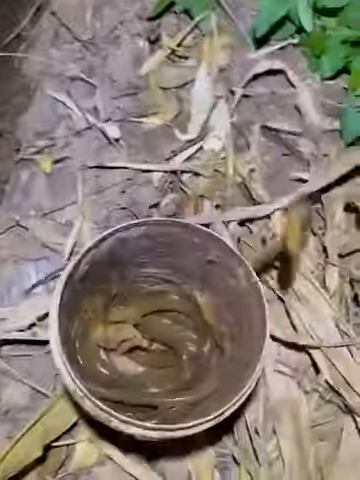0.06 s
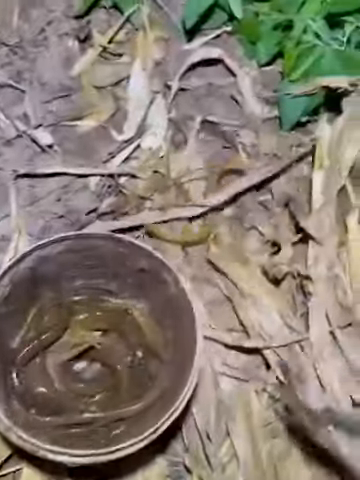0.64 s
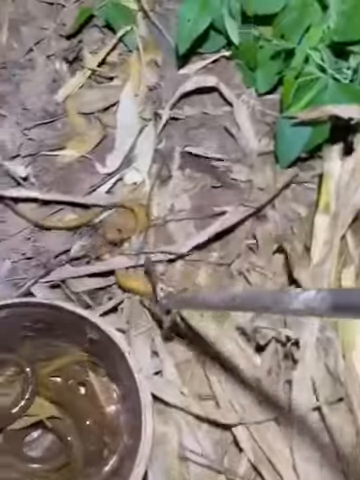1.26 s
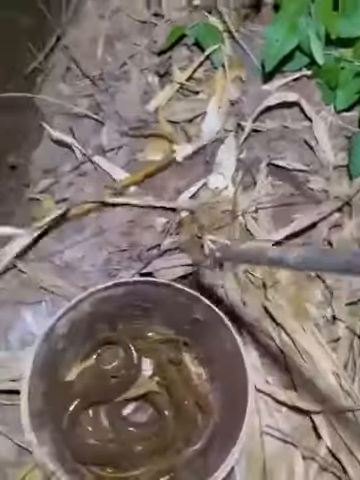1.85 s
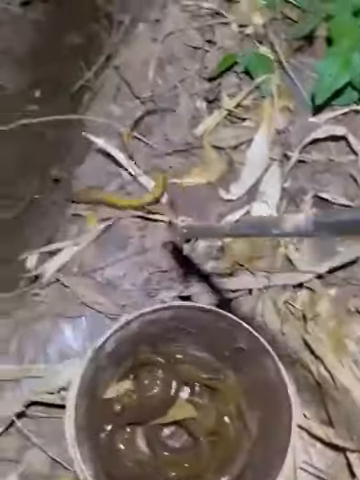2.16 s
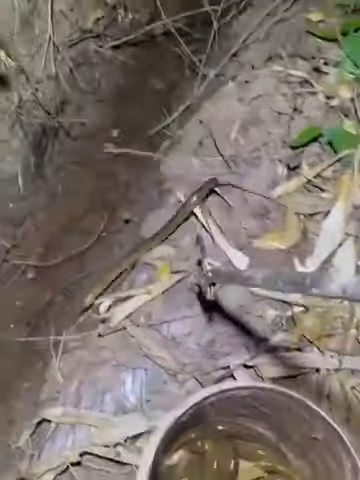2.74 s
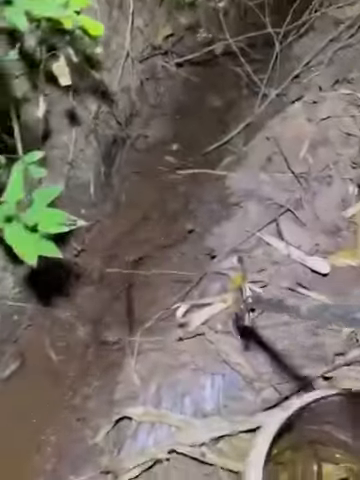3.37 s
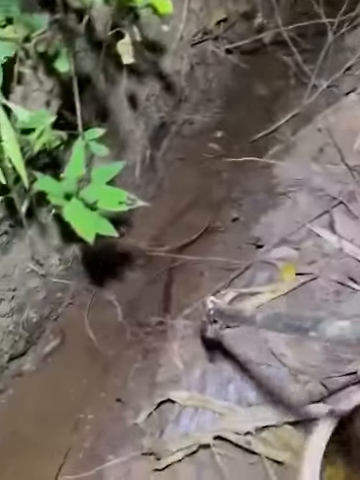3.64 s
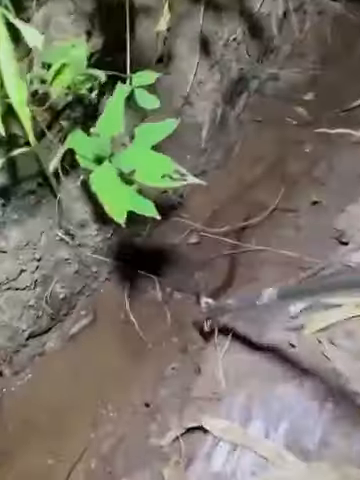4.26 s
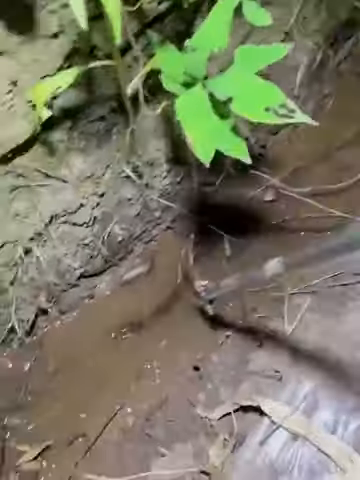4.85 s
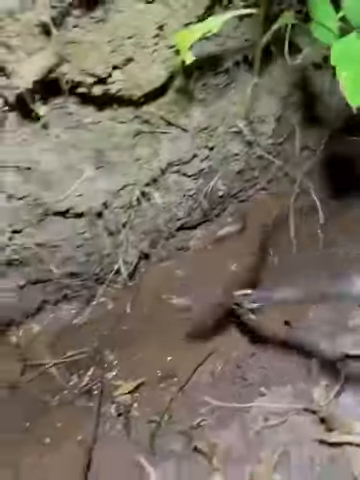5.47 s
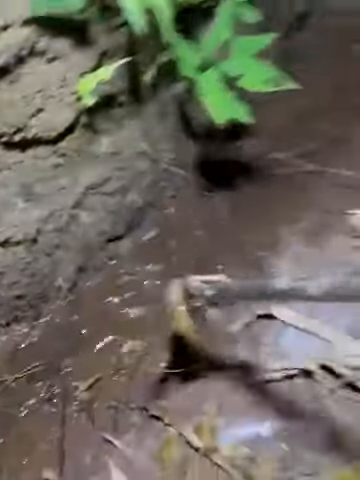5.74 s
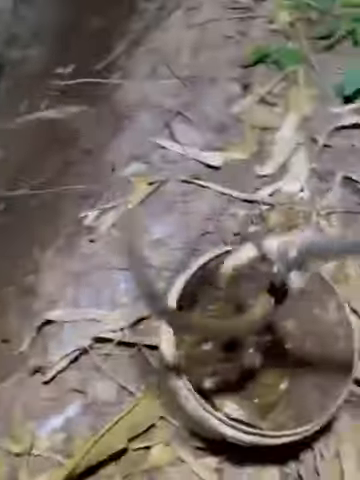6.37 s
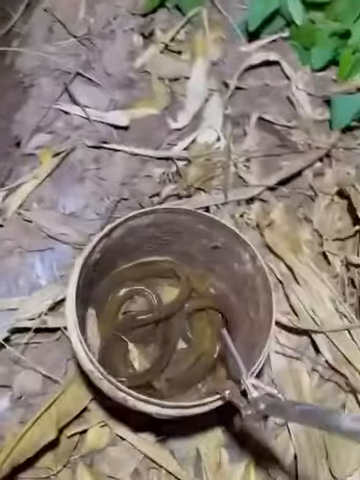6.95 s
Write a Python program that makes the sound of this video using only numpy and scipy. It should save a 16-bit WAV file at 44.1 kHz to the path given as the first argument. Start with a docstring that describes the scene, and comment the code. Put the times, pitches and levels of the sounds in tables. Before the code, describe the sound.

Outdoors at night, crickets chirp in the distance over a faint low rumble. Near the microphone an eel swishes through crackling dry leaves while metal tongs chase it, snapping once with a short buzzing ring and then clicking here and there. Mud smacks softly and a few faint bubbles pop. A louder clack of the tongs is followed by a cluster of wet slaps in a bucket.

```python
"""Dry leaves rustle and tick as an eel flops among them on a muddy bank at night.
Long metal tongs chase it: the jaws snap, their coil spring rings and buzzes, mud smacks, earth thumps.
At the end the eel drops into a bucket with wet slaps. Contacts are bursts of micro-impacts that ring
a body; rustle is fibres catching and slipping. Crickets sing in the distance over a low rumble."""
import sys
import numpy as np
from scipy import signal
from scipy.fft import rfft, irfft, next_fast_len
from scipy.io import wavfile
from scipy.ndimage import uniform_filter1d

SR = 44100
rng = np.random.default_rng(int(sys.argv[2]) if len(sys.argv) > 2 else 0)


def unload_audio(sound):
    """Save the sound as a 16-bit wav file, at the path given as the first command line argument."""
    columns = np.transpose(np.atleast_2d(sound))
    # keep every value between -1 and 1, then stretch to whole-number steps
    steps = np.round(np.clip(columns, -1, 1) * 32767)
    wavfile.write(sys.argv[1], SR, steps.astype(np.int16))


N = 317916
TIME_S = np.arange(N) / SR
LEAD_S = .01  # burst start to peak

# jaws snap or hit the ground: t/s, decay/s, contact f/Hz, thud/dB, strike/dB, brightness/dB per register
JAW_SNAPS = [(1.4242, .0052, 7360, -48, -26, 1), (1.4387, 0.0067, 4600, -60, -29, 3),
             (3.1008, 0.0065, 6550, -61, -40.5, 0), (3.1195, 0.0025, 7100, -55.5, -45, 4),
             (3.126, .0045, 14300, -78, -59.5, 8.5), (3.1793, 0.0079, 6120, -71, -42.5, -1.5),
             (3.4568, 0.0021, 2820, -44, -20, -14), (3.9394, 0.005, 3020, -37, -24, -6),
             (3.977, 0.0067, 2350, -42.5, -39, 1), (5.7116, 0.0018, 6600, -44.5, -38, .5),
             (6.1328, .0036, 4230, -29.5, -22.5, -4)]
# wet slaps in and beside the bucket: columns as JAW_SNAPS
WET_SLAPS = [(.2512, 0.0027, 730, -36, -29.5, -9), (6.5885, 0.006, 2370, -25.5, -32, -9),
             (6.5955, 0.011, 198, -35, -37, 1), (6.611, 0.01, 1450, -34, -36.5, -4),
             (6.631, 0.023, 1500, -33.5, -37, -5.5), (6.772, 0.017, 794, -29.5, -36.5, -9.5),
             (6.802, .0083, 1900, -33, -34.5, -12), (6.832, 0.0039, 3230, -46, -44, -7.5),
             (6.9805, 0.004, 867, -31.5, -25.5, -10.5)]
# tong resonances: f/Hz, width/Hz, level/dB
TONG_MODES = [(444, 60, -16), (814, 220, 13), (1150, 53, -6), (2315, 240, 7), (2540, 170, -1),
              (3220, 780, -4.5), (4350, 110, 1.5), (6000, 970, 0.5), (7790, 170, 4), (9900, 880, 6.5)]
# bucket resonances: f/Hz, width/Hz, level/dB
BUCKET_MODES = [(214, 87, 12), (354, 33, 21.5), (440, 44, 1.7), (926, 31, 4), (1300, 170, 7.8),
                (1860, 230, 7.2), (2780, 110, 1.3)]
# edges of the thud, knock, clack, click and fizz registers: f/Hz
REGISTER_EDGES = [150, 500, 1300, 3500, 8500, 16000]
# coil spring resonances: f/Hz, level/dB, t60/s
SPRING_MODES = [(2280, -14, .05), (3900, -16, 0.089), (6050, -10, 0.066), (9260, -2, 0.052),
                (9500, -4, 0.059), (10000, -3, .07), (10047, -7, 0.11), (9900, 1, 0.064), (10312, -7, .08),
                (9900, -25, .09), (10500, 4, 0.082), (10520, 2, .08), (9860, 0, .08), (10500, -6, .08),
                (11140, -17, .09), (11680, -17, .2)]
# spring rattles on its seat: t/s, level/dB
SPRING_JOLTS = [(1.4376, -33), (1.445, -24), (1.456, -38), (1.4647, -28)]
# leaf and twig ticks: t/s, level/dB, f/Hz, decay/s
LEAF_TICKS = [(.059, -27.5, 1380, 0.0088), (.234, -19, 1180, 0.024), (.314, -23.5, 3280, 0.0092),
              (.831, -21.5, 2240, 0.0086), (1.33, -23.5, 1570, 0.011), (2.204, -32, 2540, 0.0086),
              (2.227, -29, 3280, .002), (2.836, -29.5, 3290, .005), (3.409, -24.5, 6600, 0.0045),
              (3.572, -23, 5970, 0.0043), (3.919, -20, 2130, 0.016), (3.97, -25, 2530, .0072),
              (4.032, -23.5, 3220, 0.013), (4.078, -24.5, 7700, 0.0034), (4.23, -22.5, 7200, 0.0068),
              (4.405, -25.5, 1980, 0.012), (4.643, -28.5, 4570, .008), (5.176, -29, 7720, 0.013),
              (5.837, -25.5, 1460, 0.0065), (6.469, -29, 2520, 0.0032), (6.561, -22.5, 4370, .007)]
# smacks of mud and wet skin: t/s, level/dB, f/Hz, decay/s
MUD_SMACKS = [(1.597, -31.5, 950, 0.0068), (1.716, -31, 372, 0.01), (1.915, -30, 334, 0.013),
              (2.017, -37.5, 700, .005), (2.387, -35, 2290, .0081), (2.458, -41.5, 705, .004),
              (2.96, -35.5, 795, 0.005), (3.923, -23, 2390, 0.026), (4.038, -31, 725, .008),
              (4.101, -27.5, 1090, .004), (4.644, -37.5, 515, 0.0097), (4.827, -36, 1900, 0.011),
              (5.16, -33.5, 2380, 0.013), (5.624, -33.5, 2370, 0.011), (6.013, -28.5, 364, 0.029),
              (6.537, -21, 900, 0.0018), (6.72, -20.5, 1220, .0045), (6.741, -25, 1400, 0.0069)]
# bubbles and drips, and one short squeak played alike: t/s, level/dB, f/Hz, decay/s
BUBBLES = [(2.588, -49, 2230, 0.0036), (3.622, -51, 507, 0.0026), (3.655, -54.5, 1366, 0.015),
           (3.672, -47.5, 388, 0.007), (3.711, -52, 324, 0.0065), (5.471, -40.5, 2780, 0.002),
           (6.561, -35, 4300, .003)]
# thumps on soft earth: t/s, level/dB, f/Hz
TREADS = [(1.597, -41.5, 110), (2.535, -38, 127), (3.981, -38, 175), (4.039, -40.5, 127),
          (6.594, -36.5, 101), (6.606, -34, 150)]
# pushes through the litter: t/s, length/s, rub/dB, crisp hiss/dB
STROKES = [(0, 0.26, -53, -65), (0.236, 0.57, -45.5, -52), (.85, 0.3, -54.5, -58.5),
           (1.355, 0.16, -43.5, -48.5), (1.577, 0.66, -54.5, -59), (2.34, 1, -57, -63),
           (2.927, 0.037, -51, -56), (3.449, 0.088, -43.5, -51), (4.101, 0.08, -52, -56),
           (4.262, 0.21, -55.5, -63.5), (5.687, 0.615, -53.5, -62.5), (6.464, 0.017, -39.5, -50.5),
           (6.58, 0.045, -44, -56), (6.78, 0.029, -44.5, -57), (6.976, 0.14, -49, -63.5)]
# litter rub: f/Hz, level/dB
RUB_SPECTRUM = [(120, -7), (300, 2.5), (600, 1.5), (1200, 1), (2300, 1), (3800, -3), (5500, -7.5),
                (7700, -2.5), (8500, -14), (16000, -65)]
# crisp leaf hiss: f/Hz, level/dB
CRISP_SPECTRUM = [(1500, -26), (4000, 7), (7000, 2), (8050, 2), (8400, -2.5), (11000, -1.5), (13000, -8.5),
                  (15500, -7), (16200, -41)]
# eel slides over husks and bucket rim: t/s, level/dB, half length/s
SWISHES = [(0.254, -38, 0.043), (0.632, -37.5, 0.066), (1.422, -38, 0.0054), (5.288, -45, 0.039),
           (6.48, -53, 0.017)]
# husk friction: f/Hz, level/dB
HUSK_SPECTRUM = [(300, -3.5), (1200, -8), (2300, 3.5), (4500, -4), (6000, 1.5), (7500, 1), (8500, -12),
                 (15000, -19)]
# bush cricket bouts: start t/s, end t/s, level/dB
CHIRP_BOUTS = [(.30, 1.9, -59.5), (2.018, 4.6, -51), (5.21, 7.2, -51)]
# lower cricket: t/s, level/dB
TRILL_LEVEL = [(0, -60.5), (1.0, -58), (2.2, -74), (2.5, -73.5), (7.21, -61)]
# far insects: f/Hz, level/dB
CHORUS_SPECTRUM = [(300, -20), (1200, -24), (2200, -6), (3400, -11), (4000, 5.5), (4500, -8), (6000, -17),
                   (7000, 0.5), (7400, -10), (8050, -2), (8350, -67), (12000, -49), (13000, -42)]
# rumble colour: f/Hz, level/dB
RUMBLE_SPECTRUM = [(20, -30), (35, -13), (52, 2), (85, 2.5), (125, -6), (200, -1), (260, -9.5), (350, -28),
                   (700, -95), (2000, -66)]
# rumble swell: t/s, level/dB
RUMBLE_LEVEL = [(0, -60), (.28, -53.5), (.74, -56), (4.28, -55), (4.6, -59.5), (5.8, -55), (6.3, -56.5),
                (6.63, -49), (7.0, -56.5)]
# left-right likeness, close contacts: f/Hz, coherence/0-1
CLOSE_COHERENCE = [(50, .99), (200, 1), (500, 0.84), (1000, 0.52), (2000, 0.93), (4000, 0.51), (8000, 0.57),
                   (15000, .4)]
# left-right likeness, diffuse sound: f/Hz, coherence/0-1
DIFFUSE_COHERENCE = [(60, 1), (110, 1), (200, 1), (380, 0.68), (700, 0.26), (1290, 0.81), (2380, 1),
                     (4400, 0.15), (8120, 0.64), (15000, 0.62)]
# left lead of the tong contacts: f/Hz, phase/rad
LEFT_LEAD = [(200, -.1), (400, -0.77), (700, -0.88), (1100, -0.81), (1600, -0.23), (2800, 0.31),
             (5000, -1.05), (9000, -1.1), (15000, -.3)]
# left minus right: f/Hz, level/dB
BALANCE = [(200, 0), (350, -.8), (700, -4.5), (1400, -1.2), (2800, -1), (5500, .5), (14000, 0)]


def tongs():
    """Hard jaw contacts ring the metal, with a left-right phase twist."""
    snaps = blows(JAW_SNAPS, TONG_MODES, rise_s=.0014, spread=1, thud_hold=4.2, lag_s=.0003, direct=.94,
                  contact_db=8, contact_width=.076, top_hz=15400, knock_share=.35, click_db=5)
    phase_rad = at_hz(LEFT_LEAD, bins(snaps)) * np.array([[.5], [-.5]])
    return filtered(snaps, np.exp(1j * phase_rad))


def eel_slaps():
    """A soft, wet body hits ground and bucket."""
    return blows(WET_SLAPS, BUCKET_MODES, rise_s=.0012, spread=.64, thud_hold=.57, lag_s=.00217,
                 direct=.89, contact_db=6.5, contact_width=.13, top_hz=11100, knock_share=.95,
                 click_db=-.5)


def blows(rows, body, rise_s, spread, thud_hold, lag_s, direct, contact_db, contact_width, top_hz,
          knock_share, click_db):
    """Contacts ring the body and their own pitch: weight gives thud, strike clack, hardness treble."""
    out = np.zeros((2, N))
    for s, decay_s, contact_hz, thud_db, strike_db, bright_db in rows:
        sharp = impact_burst(decay_s, rise_s, spread)
        soft = impact_burst(decay_s * thud_hold, rise_s, spread)
        hz = bins(sharp)
        modes = list(body) + [(contact_hz, contact_hz * contact_width, contact_db)]
        ring = direct + sum(gain(db) / (1 + 2j * (hz - f) / width_hz) for f, width_hz, db in modes)
        ring = ring * squash(hz, lag_s) / (1 + (hz / top_hz) ** 10)
        sharp, soft = stereo(sharp, ring), stereo(soft, ring)
        knock_db = thud_db + knock_share * (strike_db - thud_db)
        bands_db = [thud_db, knock_db, strike_db,
                    strike_db + bright_db + click_db, strike_db + 2 * bright_db]
        for lo, hi, db, drive in zip(REGISTER_EDGES, REGISTER_EDGES[1:], bands_db, [soft] + 4 * [sharp]):
            band = signal.sosfilt(signal.butter(3, [lo, hi], "band", fs=SR, output="sos"), drive)
            add(out, s - LEAD_S, gain(db) * unit_rms(band) * np.sqrt(.01 * SR / band.shape[1]))
    return out


def impact_burst(decay_s, rise_s, spread, size=4096):
    """Micro-impacts swell and die away; mid and side rows, side scaled by spread."""
    t = np.arange(size) / SR - LEAD_S
    rise_s = min(rise_s, .3 * decay_s)
    envelope = np.exp(-np.maximum(-t / max(rise_s, 1e-4), t / max(decay_s, 3e-4)))
    spectrum = rfft(rng.standard_normal((2, size)) * envelope)
    flattened = irfft(spectrum / np.sqrt(abs(spectrum) + 1e-9), size)
    return flattened * envelope ** .3 * np.array([[1], [spread]])


def squash(hz, lag_s):
    """A soft contact widens as it lands, so lows come later: by lag_s at 500 Hz."""
    return np.exp(-4j * np.pi * lag_s * np.sqrt(500 * hz))


def spring_ring(shimmer_rad=.96, detune=.0033, rise_s=.00035):
    """Each jolt rings the coil's close, beating modes at a slightly different tuning."""
    out, t = np.zeros((2, N)), np.arange(SR // 5) / SR
    for s, jolt_db in SPRING_JOLTS:
        phases = rng.uniform(0, 2 * np.pi, (len(SPRING_MODES), 1, 1))
        phases = phases + shimmer_rad * rng.standard_normal((len(SPRING_MODES), 2, 1))
        stretch = 1 + detune * rng.standard_normal()
        ring = sum(gain(jolt_db + db - 60 * t / t60_s) * np.sin(2 * np.pi * hz * stretch * t + phase)
                   for (hz, db, t60_s), phase in zip(SPRING_MODES, phases))
        add(out, s, ring * (1 - np.exp(-t / rise_s)))
    return out


def coil_buzz(buzz_db=-10, decay_s=.048):
    """The coil's turns chatter against one another after each jolt."""
    power = sum(gain(2 * db) * (TIME_S > s) * np.exp(-2 * abs(TIME_S - s) / decay_s)
                for s, db in SPRING_JOLTS)
    return gain(buzz_db) * np.sqrt(power) * noise_band(hz=10450, width_hz=1300)


def leaf_ticks():
    """Dry leaves and twigs: broad, sharp pops."""
    faint = scattered(start_s=-.8, end_s=7.5, db=-36, low_hz=2000, high_hz=8000)
    return pops(list(LEAF_TICKS) + faint, pop_db=-10.5, width_oct=1, rise_s=.00089, lag_s=0)


def mud_smacks():
    """Mud and wet skin: narrower pops, falling in pitch."""
    faint = scattered(start_s=1.5, end_s=5, db=-43, low_hz=652, high_hz=2400)
    return pops(list(MUD_SMACKS) + faint, pop_db=-9.5, width_oct=.65, rise_s=.0019, lag_s=.001956)


def scattered(start_s, end_s, db, low_hz, high_hz, count=12, spread_db=3, decay_s=.004):
    """Pop rows of random time, level and pitch."""
    offsets, sizes, pitches = rng.random((count, 3)).T
    times_s = start_s + (end_s - start_s) * (np.arange(count) + offsets) / count
    return [(s, db + spread_db * (2 * size - 1), low_hz * (high_hz / low_hz) ** pitch, decay_s)
            for s, size, pitch in zip(times_s, sizes, pitches)]


def pops(rows, pop_db, width_oct, rise_s, lag_s, max_decay_s=.012):
    """Small contacts, each a burst with a spectral hump at its pitch."""
    out = np.zeros((2, N))
    for s, db, centre_hz, decay_s in rows:
        burst = impact_burst(min(decay_s, max_decay_s), rise_s, spread=1)
        hz = bins(burst)
        hump = 1 / (1 + (np.log2((hz + 1) / centre_hz) / width_oct) ** 2)
        tilt_db = at_hz([(100, 18), (400, 9), (8000, 4), (9000, -5), (16000, -12)], hz)
        pop = stereo(burst, hump * squash(hz, lag_s) * gain(tilt_db))
        add(out, s - LEAD_S, gain(db + pop_db) * pop * np.sqrt(.003 * SR / pop.shape[1]))
    return out


def bubbles(climb_per_s=2.7):
    """Bubbles ring, rising in pitch as they near the surface; a short squeak rings the same way."""
    out, t = np.zeros((2, N)), np.arange(SR // 10) / SR
    for s, db, hz, decay_s in BUBBLES:
        envelope = gain(db) * t / decay_s * np.exp(1 - t / decay_s)
        blip = envelope * np.sin(2 * np.pi * hz * (t + climb_per_s * t ** 2 / 2))
        add(out, s, np.array([blip, blip]))
    return out


def treads(decay_s=.0056):
    """Weight settles on soft earth: a few dull cycles."""
    out, t = np.zeros((2, N)), np.arange(SR // 4) / SR
    for s, db, hz in TREADS:
        thump = gain(db) * t / decay_s * np.exp(1 - t / decay_s) * np.sin(2 * np.pi * hz * t)
        add(out, s, np.array([thump, thump]))
    return out


def rustle(rub_db=1, crisp_db=5.5, clump_db=2.05):
    """Eel and tongs slide through the litter; grains come in clumps."""
    clumps = gain(clump_db * drift(top_hz=16.8))
    rub_gain, crisp_gain = stroke_gains()
    rub = diffuse(clumps * grains(per_s=1500, size_db=1.5, friction=1.52), RUB_SPECTRUM)
    rub = flicker(rub, depth_db=3) * rub_gain
    crisp = diffuse(clumps * grains(per_s=3800, size_db=4, friction=4.1), CRISP_SPECTRUM)
    crisp = flicker(crisp, depth_db=5) * crisp_gain
    return gain(rub_db) * rub + gain(crisp_db) * crisp


def stroke_gains(attack_s=.071, release_s=.074, rest_rub_db=-66.5, rest_crisp_db=-61.5):
    """Strokes swell, hold and fade; the litter never quite settles."""
    rub_power, crisp_power = gain(rest_rub_db) ** 2, gain(rest_crisp_db) ** 2
    for s, length_s, rub_db, crisp_db in STROKES:
        fade = np.maximum((s - TIME_S) / attack_s, (TIME_S - s - length_s) / release_s)
        push = np.exp(-np.clip(fade, 0, 20))
        rub_power += (gain(rub_db) * push) ** 2
        crisp_power += (gain(crisp_db) * push) ** 2
    return np.sqrt(rub_power), np.sqrt(crisp_power)


def swishes():
    """The eel's short, fast slides swell out of the rustle."""
    swell = sum(gain(db) * np.exp(-((TIME_S - s) / half_s) ** 2) for s, db, half_s in SWISHES)
    husks = diffuse(grains(per_s=3300, size_db=1, friction=.77), HUSK_SPECTRUM)
    return swell * flicker(husks, depth_db=-2)


def grains(per_s, size_db, friction):
    """Fibres catch and slip: tiny clicks over smooth friction."""
    sizes = gain(size_db * np.minimum(rng.exponential(1, N), 4))
    catches = rng.random(N) < per_s / SR
    clicks = unit_rms(sizes * catches * rng.standard_normal((2, N)))
    return clicks + friction * rng.standard_normal((2, N))


def flicker(x, depth_db):
    """The colour flickers in brief, narrow patches."""
    frames = dict(nperseg=512, noverlap=384)
    spectra = signal.stft(x, **frames)[2]
    patches = uniform_filter1d(rng.standard_normal(spectra.shape[1:]), size=4, axis=0)
    patches = unit_rms(uniform_filter1d(patches, size=7, axis=1))
    return unit_rms(signal.istft(spectra * gain(depth_db * patches), **frames)[1][:, :N])


def bank_echo(x, echo_db=-21, t60_s=.28, gap_s=.005):
    """Earth bank and plants add a faint, short tail."""
    t = np.arange(SR // 3) / SR
    tail = rng.standard_normal((2, len(t))) * gain(-60 * t / t60_s) * (t > gap_s)
    return x + gain(echo_db) * signal.fftconvolve(x, tail / np.linalg.norm(tail[0]), axes=1)[:, :N]


def bush_cricket(trim_db=-2, period_s=.192, jitter_s=.0093, spread_db=2.2, half_s=.042):
    """Bouts of high chirps on a near-steady beat."""
    envelope = np.zeros(N)
    for start_s, end_s, db in CHIRP_BOUTS:
        for k, (late, loud) in enumerate(rng.standard_normal((16, 2))):
            s = start_s + k * period_s
            if s < end_s:
                fade = ((TIME_S - s - jitter_s * late) / half_s) ** 2
                envelope += gain(db + spread_db * loud) * np.exp(-np.minimum(fade, 20))
    return gain(trim_db) * envelope * noise_band(hz=7890, width_hz=380)


def cricket(trim_db=-3, depth_db=7.2, pulse_hz=7.2):
    """A lower, pulsing trill."""
    pulses = gain(trim_db + depth_db * np.sin(2 * np.pi * pulse_hz * TIME_S))
    return pulses * gain_curve(TRILL_LEVEL) * noise_band(hz=4850, width_hz=300)


def insect_chorus(level_db=-57, waver_db=1.2):
    """Far insects merge into a wavering hiss."""
    waver = gain(level_db + waver_db * drift(top_hz=8.6))
    return waver * diffuse(rng.standard_normal((2, N)), CHORUS_SPECTRUM)


def rumble(trim_db=2):
    """Low noise that swells and sinks."""
    return gain(trim_db) * gain_curve(RUMBLE_LEVEL) * diffuse(rng.standard_normal((2, N)), RUMBLE_SPECTRUM)


def noise_band(hz, width_hz):
    """A narrow, fuzzy tone."""
    noise = rng.standard_normal((2, N))
    return stereo(noise, 1 / (1 + (2 * (bins(noise) - hz) / width_hz) ** 4), DIFFUSE_COHERENCE)


def drift(top_hz):
    """Slow noise, rms 1."""
    return unit_rms(filtered(rng.standard_normal(N), 1 / (1 + (bins(TIME_S) / top_hz) ** 4)))


def diffuse(x, spectrum):
    """Diffuse stereo with the given spectrum."""
    return stereo(x, gain(at_hz(spectrum, bins(x))), DIFFUSE_COHERENCE)


def stereo(x, response, coherence=CLOSE_COHERENCE):
    """Filters two unrelated rows as mid and side into left and right, rms 1."""
    alike = np.clip(at_hz(coherence, bins(x)), 0, .998)
    mid, side = filtered(x, response * np.sqrt([1 + alike, 1 - alike]))
    return unit_rms(np.array([mid + side, mid - side]))


def filtered(x, response):
    """Applies a response given at bins(x)."""
    size = next_fast_len(x.shape[-1])
    return irfft(rfft(x, size) * response, size)[..., :x.shape[-1]]


def bins(x):
    """FFT frequencies in Hz."""
    return np.fft.rfftfreq(next_fast_len(x.shape[-1]), 1 / SR)


def at_hz(points, hz):
    """Interpolates over log frequency."""
    f, value = np.transpose(points)
    return np.interp(np.log(hz + 1), np.log(f + 1), value)


def gain_curve(rows):
    """Rows of t/s, level/dB to gain per sample."""
    return gain(np.interp(TIME_S, *np.transpose(rows)))


def gain(db):
    """dB to amplitude."""
    return 10 ** (np.asarray(db) / 20)


def unit_rms(x):
    """Scales to rms 1."""
    return x / np.sqrt(np.mean(x ** 2) + 1e-20)


def add(mix, s, sound):
    """Mixes in a stereo sound at s seconds."""
    part = mix[:, max(round(s * SR), 0):][:, :sound.shape[1]]
    part += sound[:, :part.shape[1]]


def scene():
    """Tongs, eel and leaves close by; insects all around."""
    contacts = tongs() + eel_slaps() + spring_ring() + coil_buzz()
    contacts += leaf_ticks() + mud_smacks() + bubbles()
    close = bank_echo(contacts) + treads() + rustle() + swishes()
    return close + insect_chorus() + bush_cricket() + cricket() + rumble()


def record(dry):
    """Slight left-right colouring, then a low-pass."""
    balance_db = at_hz(BALANCE, bins(dry)) * np.array([[.5], [-.5]])
    lowpass = signal.firwin(511, cutoff=16100, window=("kaiser", 9), fs=SR)
    return signal.oaconvolve(filtered(dry, gain(balance_db)), lowpass[None], "same")


dry = scene()
out = record(dry)
unload_audio(out)
```